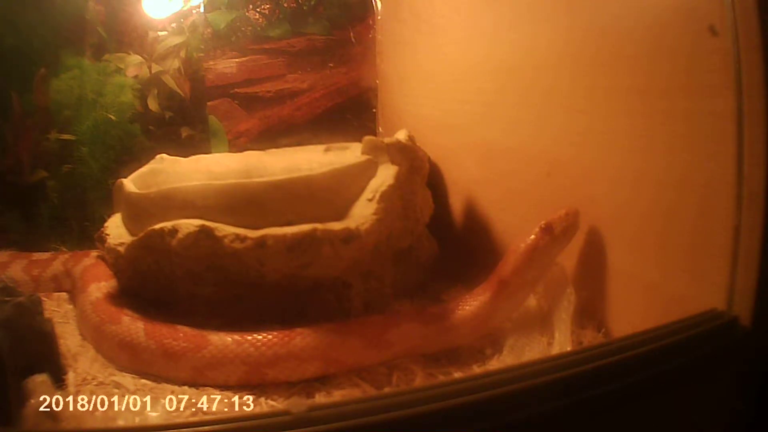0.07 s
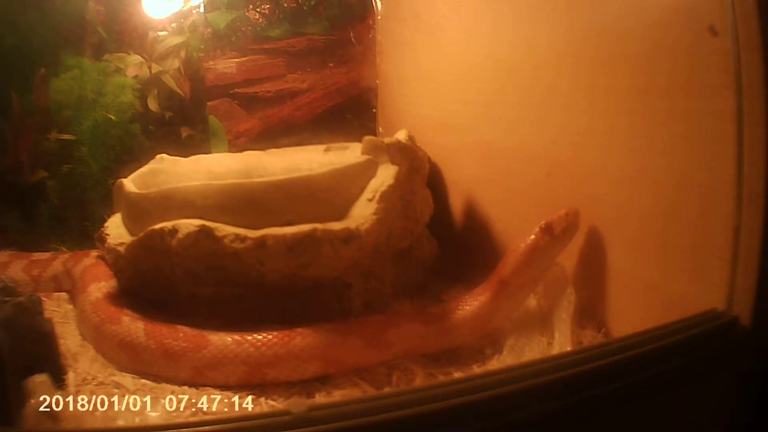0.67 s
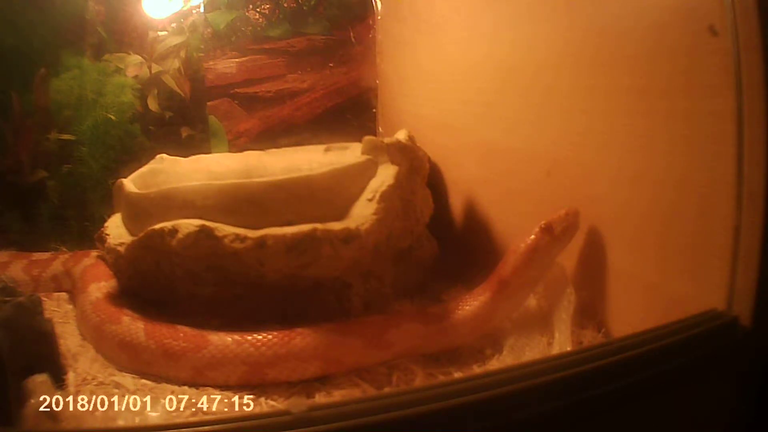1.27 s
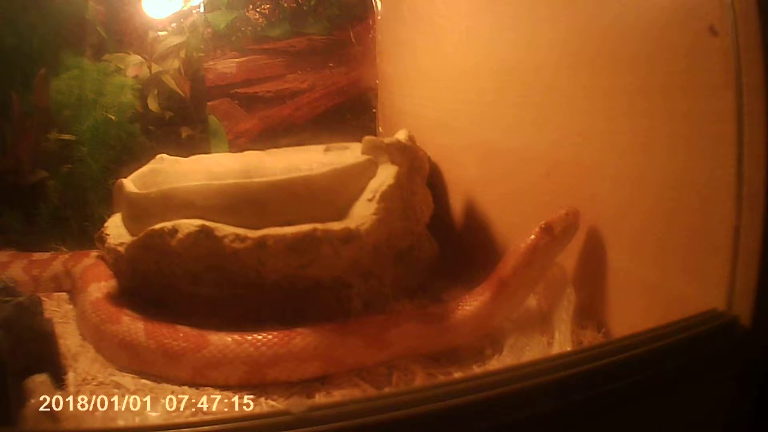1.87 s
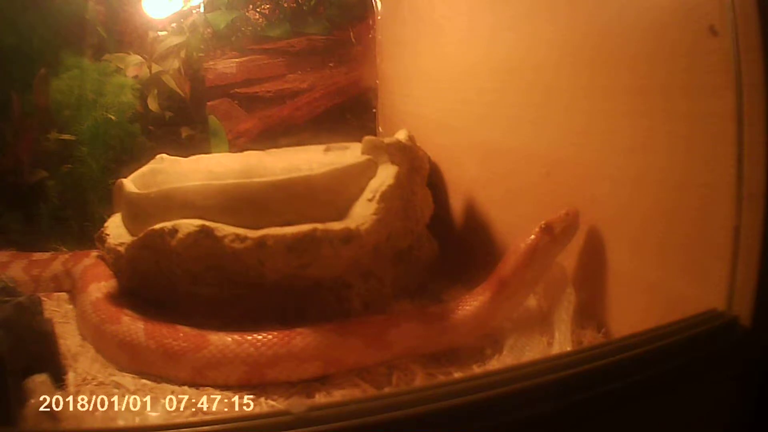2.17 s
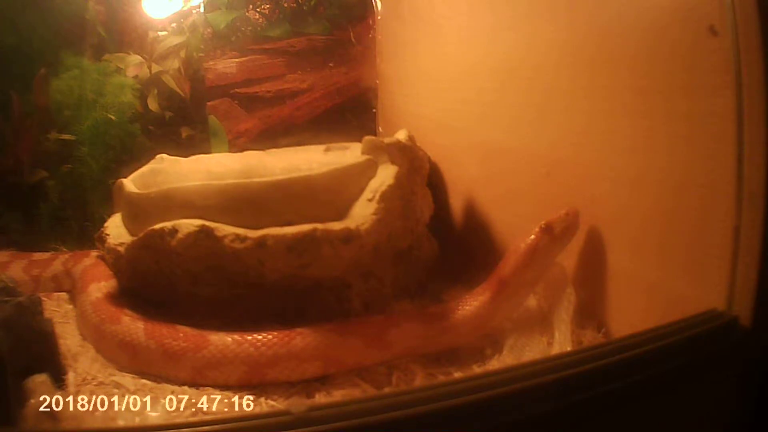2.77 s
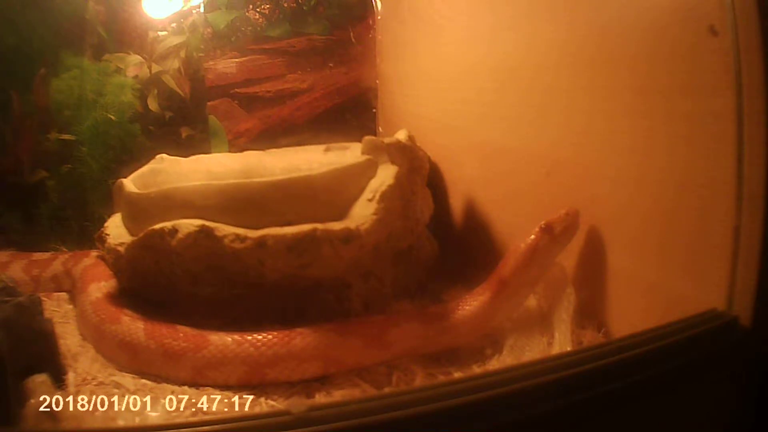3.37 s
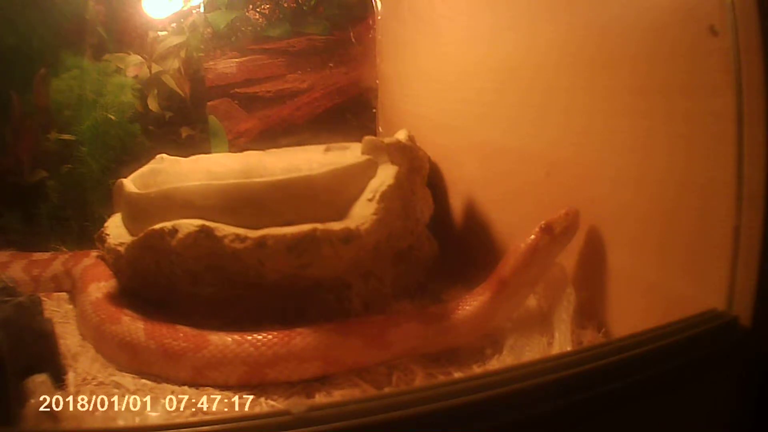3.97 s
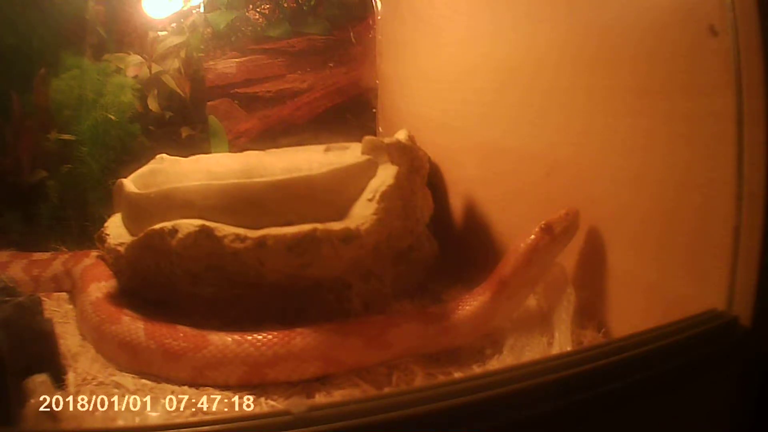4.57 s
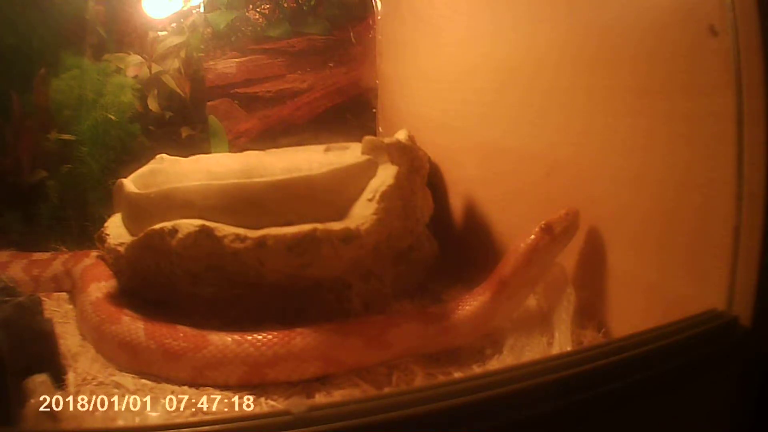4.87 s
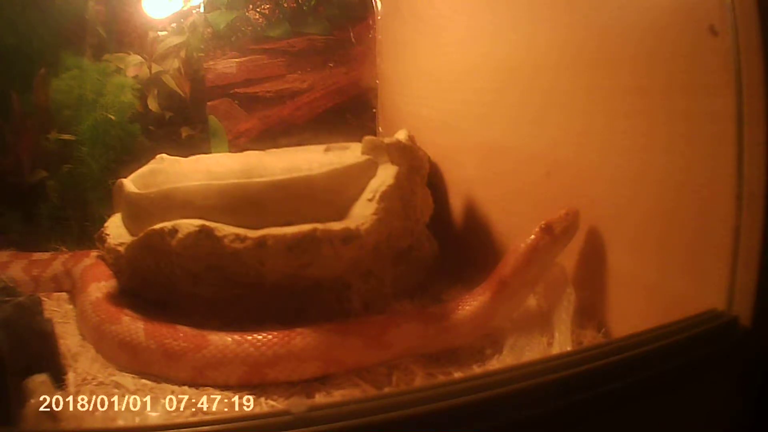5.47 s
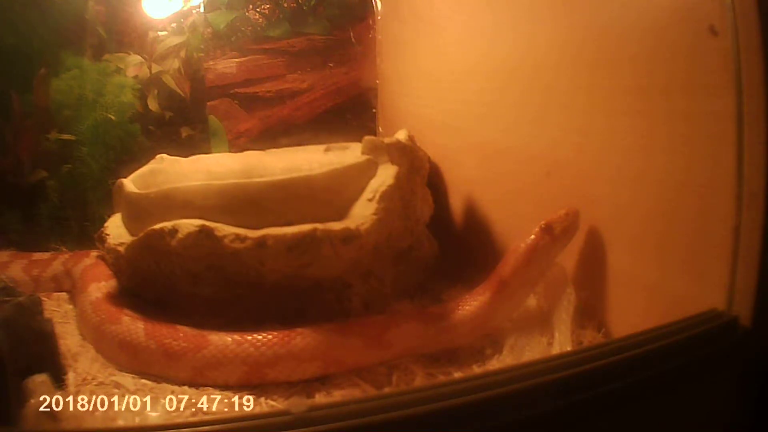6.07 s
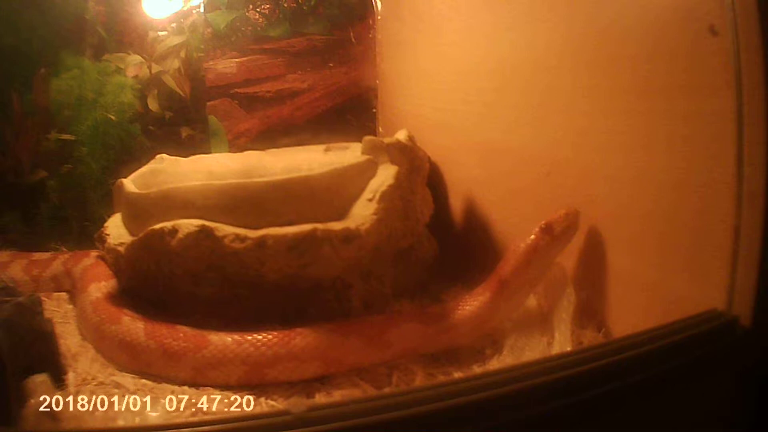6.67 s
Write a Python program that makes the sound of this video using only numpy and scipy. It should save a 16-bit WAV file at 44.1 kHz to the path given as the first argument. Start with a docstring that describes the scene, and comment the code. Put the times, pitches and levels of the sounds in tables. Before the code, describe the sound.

A steady deep rumble of air and faint hiss in a quiet room, with very faint, high electronic ticks.

```python
"""A quiet room, heard from a small camera that watches a snake lying still in its tank.
From the start, moving air lays a deep rumble over amplifier hiss, and the camera's electronics leak in:
a thin whine and runs of tiny chirping ticks on its frame clock, each trailed by three puffs of fizz.
The low end swells gently at 2.4 s. From 3 s to about 5 s the ticks crowd into three busy spells,
and after 6.1 s their runs land one frame late."""
import sys
import numpy as np
from scipy import signal
from scipy.fft import rfft, irfft, next_fast_len
from scipy.io import wavfile

SR = 44100
rng = np.random.default_rng(int(sys.argv[2]) if len(sys.argv) > 2 else 0)


def wav_out(sig):
    """Save sig, one row per channel (or a flat mono array), as 16-bit PCM at SR to the path in sys.argv[1]."""
    wavfile.write(sys.argv[1], SR, np.round(np.clip(np.atleast_2d(sig).T, -1, 1) * 32767).astype(np.int16))


N = 296793

# rumble of the room air: f/Hz, level/dB per Hz
AIR = [(5, -52), (18, -53.5), (40, -56.5), (65, -61), (100, -66), (160, -72.5), (250, -78.5), (400, -84.5),
       (700, -91.5), (1000, -96.5), (2200, -106.6), (4500, -116.5), (9000, -128)]
# busy spells with a tick on every frame: start t/s, end t/s
BUSY = [(3.0, 3.07), (4.0, 4.07), (4.64, 5.07)]
# puffs of fizz after each tick: delay t/s, half length t/s, level/dB
PUFFS = [(.025, 0.0045, 3.5), (0.046, .008, -3), (.070, .005, 1)]
# colour of the fizz, before the puffs shape it: f/Hz, level/dB per Hz
FIZZ = [(3000, -132), (6500, -125), (9300, -119.5), (12000, -125), (15000, -127)]
# whine of the power supply: f/Hz, width f/Hz, rms level/dB
WHINE = [(8715, 30, -99), (9430, 6, -104), (9850, 3.7, -103), (9965, 6.6, -104)]
# amplifier hiss: f/Hz, level/dB per Hz
HISS = [(1000, -117), (4500, -116.7), (8000, -117), (10500, -118.5), (13000, -118.9), (14500, -120.8),
        (15600, -126)]


def room_air(swell_s=2.4, half_length_s=.4, swell_db=1.4, below_hz=450):
    """Moving air makes a deep, even bed of rumble; its low end swells once and settles."""
    air = coloured_noise(AIR)
    lows = signal.sosfiltfilt(signal.butter(2, below_hz, fs=SR, output="sos"), air)
    t = np.arange(N) / SR
    lift_db = swell_db * np.exp(-((t - swell_s) / half_length_s) ** 2)
    return air + (from_db(lift_db) - 1) * lows


def tick_clock(frame_s=1 / 25, first_frame_s=.0115, slip_s=6.1):
    """The rhythm of the ticks: a pulse on each frame where the camera draws a burst of current."""
    first_run, run_frames, tick_frames = -21, 25, 3  # in frames: one run a second
    ticks_per_run = 8
    frame = np.arange(int((N / SR - first_frame_s) / frame_s) + 1)
    times = first_frame_s + frame * frame_s
    in_run = (frame - first_run - (times > slip_s)) % run_frames  # a frame late after the slip
    ticking = (in_run % tick_frames == 0) & (in_run < ticks_per_run * tick_frames)
    for start, end in BUSY:
        ticking |= (times > start) & (times < end)
    pulses = np.zeros(N)
    pulses[np.round(times[ticking] * SR).astype(int)] = 1
    return pulses


def ticks(clock, level_db=-70.0, uneven_db=1.5, length_s=.0027, rise_s=.0004,
          start_hz=9000, end_hz=6000, glide_s=.00076, octave_db=-13):
    """Under each burst of load the supply sings a tiny chirp that dives in pitch."""
    t = np.arange(int(length_s * SR)) / SR
    pitch_hz = end_hz + (start_hz - end_hz) * np.exp(-t / glide_s)
    phase = 2 * np.pi * np.cumsum(pitch_hz) / SR
    envelope = (1 - np.exp(-t / rise_s)) * signal.windows.tukey(len(t), .1)
    chirp = envelope * (np.sin(phase) + from_db(octave_db) * np.sin(2 * phase))
    accents = from_db(level_db + uneven_db * rng.standard_normal(N))
    return np.convolve(clock * accents, chirp)[:N]


def fizz(clock):
    """The circuits stay busy after a tick and give it a tail of three soft, bright puffs."""
    t = np.arange(SR // 10) / SR
    tail_power = sum(from_db(db) ** 2 * np.exp(-((t - delay) / half) ** 2) for delay, half, db in PUFFS)
    power = np.clip(signal.fftconvolve(clock, tail_power)[:N], 0, None)
    return np.sqrt(power) * coloured_noise(FIZZ)


def whine():
    """The power supply holds thin, high tones, each blurred by a random walk of its phase."""
    tones = np.zeros(N)
    for hz, width_hz, level_db in WHINE:
        wander = np.sqrt(2 * np.pi * width_hz / SR) * rng.standard_normal(N)
        phase = np.cumsum(2 * np.pi * hz / SR + wander)
        tones += np.sqrt(2) * from_db(level_db) * np.sin(phase)
    return tones


def amplifier_hiss():
    """The microphone amplifier lays a faint, steady noise floor under everything."""
    return coloured_noise(HISS)


def coloured_noise(spectrum):
    """Steady noise, shaped by an EQ curve of points: f/Hz, level/dB per Hz."""
    hz, level_db = np.transpose(spectrum)
    size = next_fast_len(N)
    bin_hz = np.maximum(np.arange(size // 2 + 1) * SR / size, 1)
    gain = from_db(np.interp(np.log(bin_hz), np.log(hz), level_db))
    return irfft(rfft(rng.standard_normal(size)) * gain, size)[:N] * np.sqrt(SR / 2)


def from_db(db):
    """Decibels to gain."""
    return 10 ** (np.asarray(db) / 20)


def scene():
    """A mono mix of room air and camera electronics; one clock triggers both ticks and fizz."""
    clock = tick_clock()
    electronics = amplifier_hiss() + ticks(clock) + fizz(clock) + whine()
    return (room_air() + electronics)[None, :]


def record(dry, offset=.0201, cutoff_hz=15650):
    """The converter rests slightly off zero, and the top end is cut steeply."""
    low_pass = signal.ellip(12, .1, 80, cutoff_hz, fs=SR, output="sos")
    at_rest = offset * signal.sosfilt_zi(low_pass)[:, None, :]  # starts settled, so no click
    return signal.sosfilt(low_pass, dry + offset, zi=at_rest)[0]


dry = scene()
out = record(dry)
wav_out(out)
```